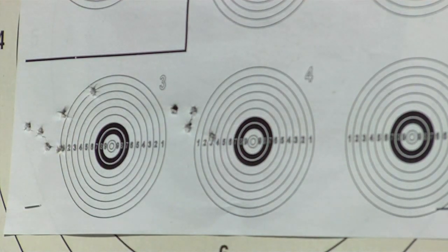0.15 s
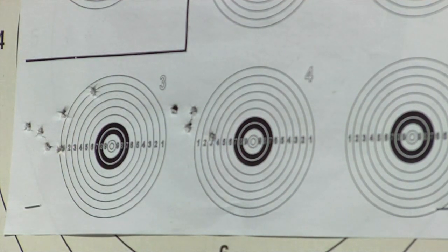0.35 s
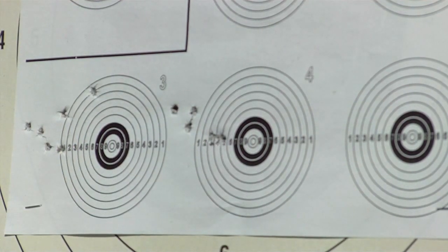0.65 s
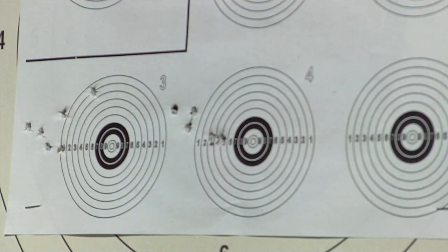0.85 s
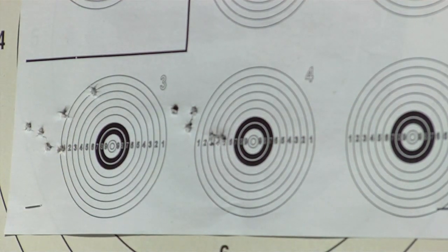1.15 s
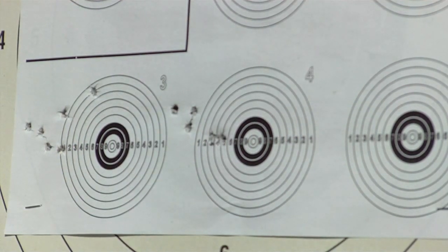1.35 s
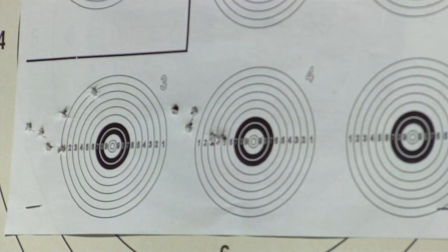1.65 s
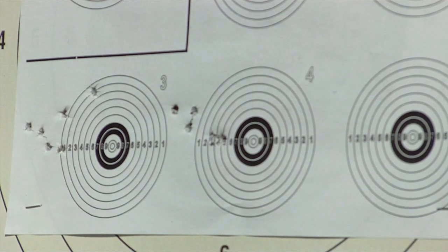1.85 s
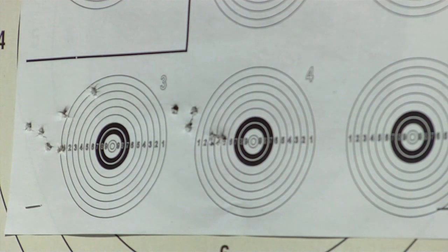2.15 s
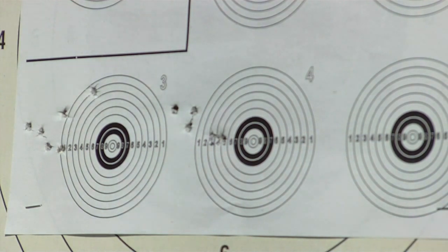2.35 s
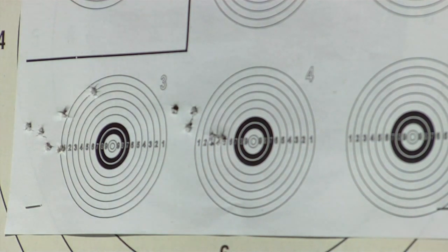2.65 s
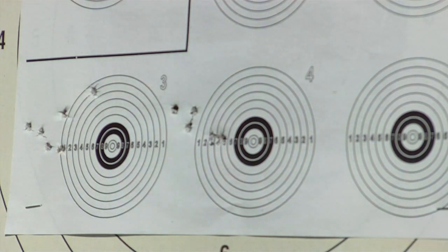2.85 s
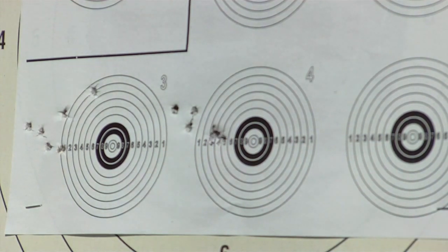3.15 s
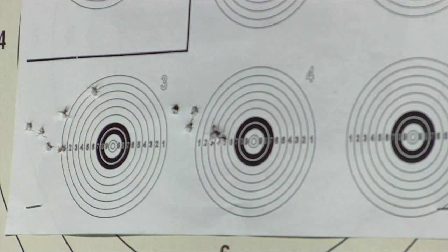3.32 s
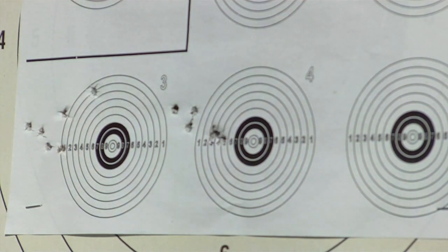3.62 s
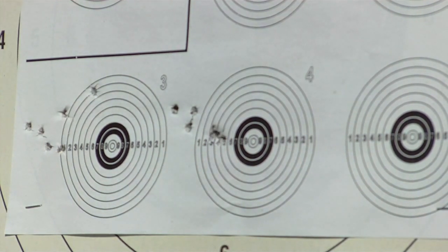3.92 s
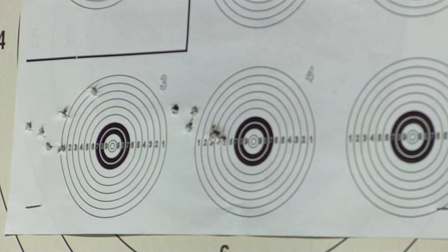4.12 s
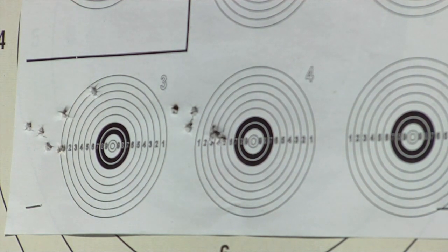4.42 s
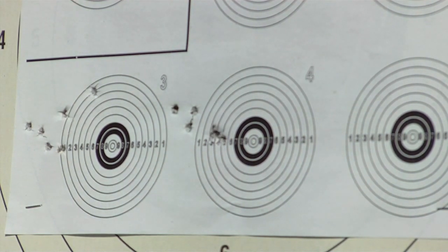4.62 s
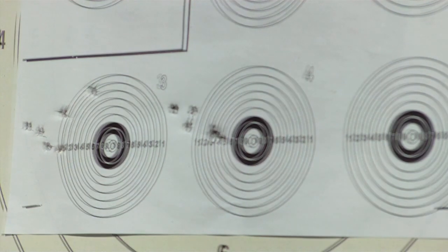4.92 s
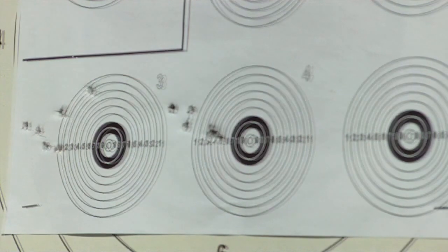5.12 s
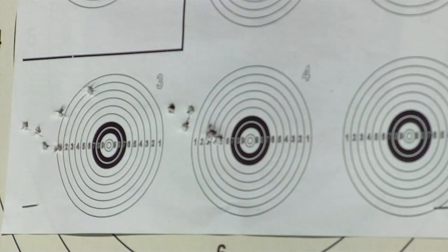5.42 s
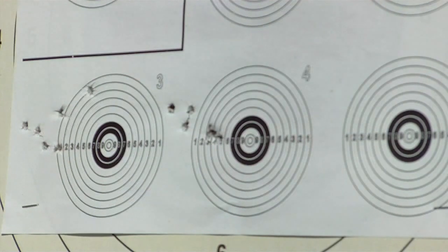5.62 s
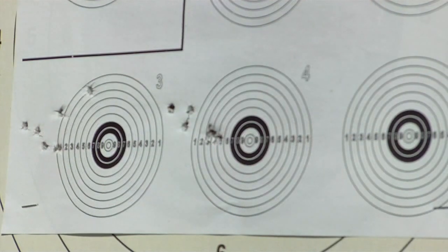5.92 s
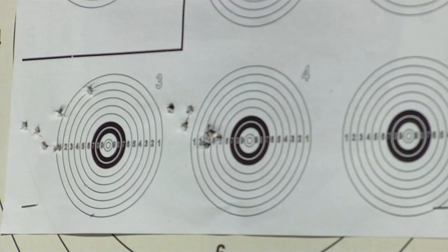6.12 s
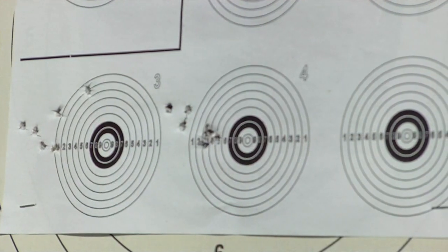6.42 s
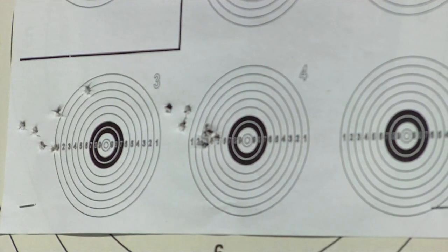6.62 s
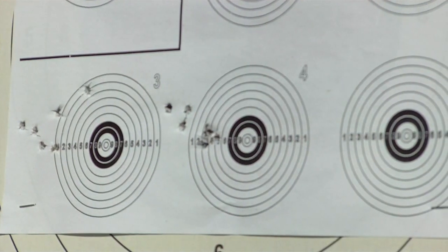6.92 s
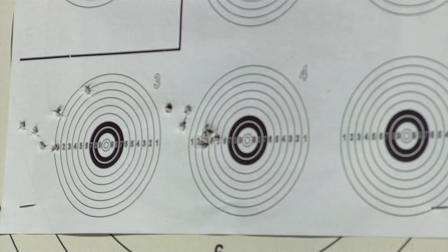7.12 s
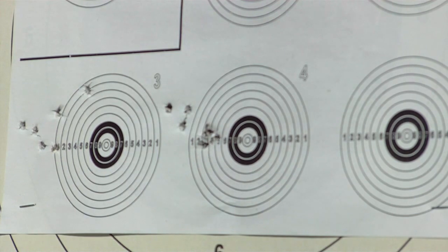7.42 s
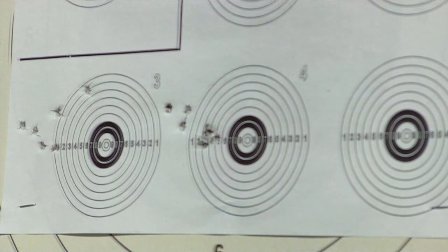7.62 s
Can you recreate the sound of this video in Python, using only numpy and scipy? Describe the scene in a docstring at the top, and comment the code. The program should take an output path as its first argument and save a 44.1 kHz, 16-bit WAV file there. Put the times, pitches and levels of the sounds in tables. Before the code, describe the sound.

Three air rifle shots crack and hit a target board outdoors, echoing through trees over wind rumble and faint birds.

```python
"""An air rifle fires three times across a wooded field, heard from beside the paper target.
At 0.4 s the muzzle pops and bounces between near walls; the slower pellet hisses in and smacks the
target 0.08 s later. Both overload the microphone, and the trees echo on. Then wind buffets the
microphone, far birds whistle, something clacks and the electronics tick, over a thin whine and a far
road. The rifle fires again at 3 s and 6 s, and a last gust thumps at 7.6 s."""
import sys
import numpy as np
from scipy import signal
from scipy.fft import rfft, irfft, next_fast_len
from scipy.io import wavfile
from scipy.ndimage import map_coordinates

SR = 44100
rng = np.random.default_rng(int(sys.argv[2]) if len(sys.argv) > 2 else 0)


def digitize_waveform(pressure):
    """Quantize a signal to 16-bit integers and store it at the path in sys.argv[1].

    Rows of a 2-D input are taken as channels; values are limited to [-1, 1].
    """
    field = np.atleast_2d(pressure).T
    bounded = np.clip(field, -1, 1)
    quanta = np.round(bounded * 32767).astype(np.int16)
    wavfile.write(sys.argv[1], SR, quanta)


N = 342657

# the shots: report_s, report_db, wall_round_trip_s, impact_s, impact_db, rebound_db, echo_db
SHOTS = [(0.3893, 8, .00855, .4721, 11, -7, -30), (2.988, 10, .00838, 3.0694, 12, -12.5, -30.5),
         (6.028, 10, .00832, 6.113, 12.5, -9, -30)]
# colour of a sharp crack, for the pellet's blow and the muzzle's turbulence: freq_hz, density_db
CRACK = [(100, -10.5), (1000, -3), (3700, -5), (5000, -6), (9000, -13.5), (16000, -19)]


def muzzle_reports():
    """The pop bounces between near walls, each pass doubled by the ground, then returns from the trees."""
    # the report head-on, with the blunt front of escaping air: freq_hz, density_db
    blast_colour = [(50, -15.5), (150, -4), (400, -9.5), (900, -6.5), (1500, -0.5), (2000, 2), (2500, 2),
                    (2780, 5), (3200, -3), (4200, -21), (7000, -30.5), (16000, -44)]
    # the report off soft ground, which returns the ring but swallows the blast: freq_hz, density_db
    ground_colour = [(40, -24), (160, -15.5), (400, -23.5), (900, -19), (1550, -10), (2150, -7), (2560, 0),
                     (2780, 3.5), (3050, -1), (3500, -7.5), (4300, -22.5), (7000, -36.5), (11000, -36),
                     (16000, -46.5)]
    # the report scattered by the trees: freq_hz, density_db
    echo_colour = [(100, -14), (400, -14.5), (900, -10), (1600, -6), (2050, -9.5), (2750, -0.5),
                   (3300, -1.5), (3900, -7), (4600, -14), (7000, -29.5), (11000, -28), (16000, -38)]
    # passes between the near walls: round_trips, gain_db
    passes = [(0, 1), (1, 2), (2, -16.5)]
    # fainter paths by ground and walls: offset_s, gain_db
    paths = [(-.003, -36.5), (-.0011, -25.5), (0.0119, -22), (0.0245, -25.5), (.0402, -26), (0.0487, -27)]
    out, t = np.zeros(N), clock(.05)
    blast, ground_pop = -pulse(blast_colour), -pulse(ground_colour)
    for report_s, report_db, round_trip_s, _, _, _, echo_db in SHOTS:
        for round_trips, gain_db in passes:
            arrival_s = report_s + round(round_trips) * round_trip_s
            pass_db = report_db + gain_db
            turbulence = fade(t, .012) * noise(CRACK, len(t))
            add(out, arrival_s, amp(pass_db) * blast)
            add(out, arrival_s, amp(pass_db - 22) * turbulence)
            add(out, arrival_s + .0047, amp(pass_db - 16.5) * ground_pop)
        for offset_s, gain_db in paths:
            add(out, report_s + offset_s, amp(report_db + gain_db) * ground_pop)
        echo = tree_echo(echo_colour, near_s=.045, falloff=.87, grain_db=1.47)
        add(out, report_s, amp(echo_db + 2) * echo)
    return out


def pellets():
    """The pellet hisses closer, punches through the paper into the board and rebounds twice."""
    # the pellet's hiss in flight: freq_hz, density_db
    flight_colour = [(1000, -15), (3500, -2), (7000, -11), (11000, 5.5), (16000, -10.5)]
    # the board's dull shudder: freq_hz, density_db
    shudder_colour = [(100, -10), (330, 5.5), (480, -2), (650, -4.5), (900, -4), (1700, -3.5), (3000, -3),
                      (4500, -14), (8000, -31.5), (16000, -40)]
    # tearing paper: freq_hz, density_db
    paper_colour = [(150, -1.5), (800, -6), (2000, -6.5), (3000, -1), (5000, -7), (7500, -17),
                    (10000, -8.5), (13500, -2), (16000, -9.5)]
    out, t = np.zeros(N), np.arange(2 ** 13) / SR
    for report_s, _, _, impact_s, impact_db, rebound_db, _ in SHOTS:
        left_s = clock(impact_s - report_s)[::-1]  # time left to fly, so distance to go
        approach = amp(-40) / (1 + left_s / .012)
        add(out, report_s, approach * noise(flight_colour, len(t))[:len(left_s)])
        add(out, impact_s, amp(impact_db) * board_hit(t, crack_db=-5.5, grit_db=-8.5))
        add(out, impact_s + .0073, amp(rebound_db) * board_hit(t, crack_db=-9.5, grit_db=-12.5))
        add(out, impact_s + .01, amp(rebound_db - 8.5) * board_hit(t, crack_db=-4.5, grit_db=-14))
        add(out, impact_s, amp(impact_db - 24) * fade(t, .038) * noise(shudder_colour, len(t)))
        tear = amp(-21.5) * fade(t, .051) + amp(-43) * fade(t, .21)
        add(out, impact_s, tear * noise(paper_colour, len(t)))
    return out


def board_hit(t, crack_db, grit_db):
    """One contact of the pellet: a gritty crack, and the board's modes ringing at new strengths."""
    # the target board's modes: pitch_hz, level_db, t60_s
    modes = [(290, -30.5, 0.0037), (1251.7, -27.5, 0.005), (1700, -18.5, 0.019), (2300, -24.5, 0.01),
             (2740, -18.5, 0.024), (3190, -11.5, 0.015), (3630, 4, 0.0041)]
    variations_db = rng.normal(0, 1, len(modes))
    ring = sum(amp(level_db + variation_db) * fade(t, t60_s) * np.sin(2 * np.pi * pitch_hz * t)
               for (pitch_hz, level_db, t60_s), variation_db in zip(modes, variations_db))
    grit = amp(grit_db) * fade(t, .0061) * noise(CRACK, len(t))
    return ring + grit + amp(crack_db) * pulse(CRACK, size=len(t))


def tree_echo(colour, near_s, falloff, grain_db):
    """An echo from countless trunks: it thins with distance, and the air takes the treble first."""
    # decay among the trees: freq_hz, t60_s
    decay_times = [(150, 1.9), (700, 5.3), (1600, 7.2), (3000, 4), (4500, 2.3), (7000, .9), (12000, 0.92)]
    # denser stands answer louder: delay_s, width_s, boost_db
    groves = [(.143, .011, 3.5), (.253, 0.008, 6), (0.428, 0.025, 2)]
    t = clock(2)
    hz, frame_s, bands = signal.stft(noise(colour, len(t)), SR, nperseg=256)
    decay = fade(frame_s, along(decay_times, hz)[:, None])
    tail = signal.istft(bands * decay, SR)[1][:len(t)]
    attack = 1 - np.exp(-t / .0022)
    thinning = (1 + t / near_s) ** -falloff
    groves_db = sum(db * np.exp(-((t - delay_s) / width_s) ** 2) for delay_s, width_s, db in groves)
    return tail * attack * thinning * amp(groves_db + grain_db * wobble(250, len(t)))


def wind():
    """Wind on the microphone: a lumpy rumble, and a flutter that grows faster, so gusts are brighter."""
    # the wind's strength: time_s, level_db
    strength = [(0, -53.5), (0.88, -46.5), (1.08, -32), (1.4, -43), (1.55, -26), (1.81, -30.5), (2.01, -23),
                (2.09, -32), (2.18, -21.5), (2.44, -29.5), (2.48, -39.5), (3.12, -39), (3.17, -30.5),
                (3.51, -38), (4.21, -41), (4.44, -31), (4.61, -40), (5.0, -42.5), (5.07, -35.5),
                (5.34, -36), (5.45, -51), (7.52, -52), (7.58, -31), (7.77, -39)]
    # deep rumble: freq_hz, density_db
    rumble_colour = [(5, -1.5), (12, 4.5), (22, 8.5), (45, -0.5), (70, -3.5), (100, -13.5), (150, -31),
                     (300, -100)]
    # the flutter above it: freq_hz, density_db
    flutter_colour = [(55, -31), (90, 1), (125, -2.5), (200, -11.5), (300, -21.5), (450, -38), (900, -59.5),
                      (2000, -100)]
    # the hardest eddies hit the microphone's port: centre_s, width_s, peak_db
    thumps = [(1.993, 0.0016, -13), (2.229, 0.0029, -13), (7.592, .008, -16)]
    full_gust_db, flutter_growth = -30, 1.7  # growth in dB per dB of wind
    t, wind_db = np.arange(N) / SR, automation(strength)
    eddies = wobble(rate_hz=33)
    rumble = unit(noise(rumble_colour) * amp(2.5 * eddies))
    flutter = unit(noise(flutter_colour) * amp(5 * eddies))
    flutter_db = -46 + flutter_growth * (wind_db - full_gust_db)
    out = amp(wind_db + .5) * rumble + amp(flutter_db) * flutter
    for centre_s, width_s, peak_db in thumps:
        out += amp(peak_db) * np.exp(-((t - centre_s) / width_s) ** 2)
    return out


def birds():
    """Far whistles swell as they slide to a held pitch; the farther ones come mostly via the trees."""
    # bird notes: start_s, length_s, start_hz, end_hz, level_db, wet_share (0-1)
    notes = [(1.221, 0.064, 2424, 4300, -52.5, 0.3), (1.57, .07, 2390, 4260, -52, 0.3),
             (1.828, 0.13, 3590, 3660, -62, .65), (2.276, .2, 3580, 3670, -66, .6),
             (2.286, .28, 1798, 1530, -65.5, .5), (2.687, 0.16, 2060, 2140, -67, .65),
             (2.725, .22, 3560, 3660, -65, .55), (2.805, .11, 3188, 2450, -54, .85),
             (4.225, 0.203, 3200, 3270, -62, 0.45), (4.999, 0.073, 3820, 3890, -62.5, .5),
             (6.576, .05, 3620, 3700, -54, .4), (7.002, 0.086, 3520, 3660, -55.5, 0.48)]
    out = np.zeros(N)
    for start_s, length_s, start_hz, end_hz, level_db, wet_share in notes:
        t, glide_s = clock(length_s), .65 * length_s
        pitch_hz = np.interp(t, [0, glide_s], [start_hz, end_hz]) * (1 + .008 * wobble(130, len(t)))
        swell_db = np.interp(t, [0, glide_s, length_s], [-11, 0, -3])
        envelope = amp(level_db + swell_db) * signal.windows.tukey(len(t), .5)
        note = envelope * np.sin(2 * np.pi * np.cumsum(pitch_hz) / SR)
        tail = rng.standard_normal(SR) * fade(clock(1), t60_s=.99)
        add(out, start_s, np.sqrt(1 - wet_share) * note)
        add(out, start_s, np.sqrt(wet_share) * signal.fftconvolve(note, tail / np.linalg.norm(tail)))
    return out


def clacks():
    """Faint, dry, distant clacks: each a click in a short rattle."""
    # the clacks: start_s, level_db
    hits = [(1.5095, -39.5), (6.6324, -35), (6.8328, -34.5)]
    # colour of click and rattle: freq_hz, density_db
    colour = [(200, -2), (800, 8), (1800, -6.5), (3000, 3), (4500, -10), (10000, -25), (16000, -28.5)]
    out, t, click = np.zeros(N), clock(.2), pulse(colour)
    for start_s, level_db in hits:
        add(out, start_s, amp(level_db - .5) * click)
        add(out, start_s - .002, amp(level_db - 9.5) * fade(t, .044) * noise(colour, len(t)))
    return out


def electronics():
    """A thin whine, spells of hiss in which the whine changes level, and ticks where the signal jumps."""
    # the whine's tones: pitch_hz, rms_db
    tones = [(7865, -83), (11989, -74.5)]
    # spells of hiss that the electronics switch on: start_s, end_s, whine_change_db
    spells = [(1.814, 2.431, 3), (4.771, 5.365, -4), (7.568, 7.8, -1)]
    # electronic hiss: freq_hz, density_db
    hiss_colour = [(100, 9), (500, 6.5), (1500, 4), (5000, 0.5), (16000, -2)]
    # electrical ticks: start_s, step_db
    ticks = [(1.7911, -34.5), (1.8172, -27), (2.4312, -32.5), (5.3649, -31), (7.5504, -31.5), (7.569, -31)]
    t = np.arange(N) / SR
    whine = sum(amp(rms_db) * np.sqrt(2) * np.sin(2 * np.pi * pitch_hz * t + .6 * wobble(90))
                for pitch_hz, rms_db in tones)
    hiss = amp(-67) * noise(hiss_colour)
    out = whine.copy()
    for start_s, end_s, whine_change_db in spells:
        out = np.where((t >= start_s) & (t < end_s), amp(whine_change_db) * whine + hiss, out)
    for start_s, step_db in ticks:
        add(out, start_s, -amp(step_db) * fade(clock(.1), .075))
    return out


def air_and_road():
    """A bed of still air and microphone hiss, with a far road that swells and fades."""
    # distant hum and microphone hiss: freq_hz, density_db
    air_colour = [(59, -47), (100, -25), (163, -5), (225, -9), (328, -20.5), (415, -17), (492, -22.5),
                  (547, -19), (854, -26), (930, -28), (2170, -30.5), (2370, -30), (10000, -35),
                  (12100, -35), (16000, -42.5)]
    # swells of far traffic: time_s, level_db
    traffic = [(0, -74.5), (1.2, -73.5), (2, -67), (2.7, -70.5), (3.6, -64.5), (4.6, -72.5), (5.2, -66),
               (5.8, -83), (7.77, -79)]
    # the road's murmur: freq_hz, density_db
    road_colour = [(120, -22.5), (240, -12.5), (330, 0), (410, -0.5), (520, 1), (650, -5.5), (900, -16),
                   (1500, -27.5), (4000, -59)]
    return amp(-62) * noise(air_colour) + amp(automation(traffic)) * noise(road_colour)


def amp(db):
    """Decibels as a gain."""
    return 10 ** (np.asarray(db) / 20)


def unit(x):
    """The signal scaled to rms 1."""
    return x / np.sqrt(np.mean(x ** 2) + 1e-20)


def clock(length_s):
    """Sample times in seconds."""
    return np.arange(int(length_s * SR)) / SR


def along(points, hz):
    """Read (freq_hz, value) points on a log frequency axis."""
    freqs_hz, values = np.transpose(points)
    return np.interp(np.log(hz + 1), np.log(freqs_hz + 1), values)


def automation(points):
    """Join (time_s, value) points into one value per sample."""
    return np.interp(np.arange(N) / SR, *np.transpose(points))


def wobble(rate_hz, size=N):
    """A smooth random curve with rate_hz knots a second."""
    knots = rng.standard_normal(int(size * rate_hz / SR) + 4)
    return map_coordinates(knots, [np.arange(size) * rate_hz / SR])


def noise(colour, size=N):
    """Noise of rms 1 with the given colour."""
    fft_size = next_fast_len(size)
    gain = amp(along(colour, np.fft.rfftfreq(fft_size, 1 / SR)))
    return unit(irfft(rfft(rng.standard_normal(fft_size)) * gain, fft_size)[:size])


def pulse(colour, size=2048):
    """The sharpest causal pulse with the given colour, peak 1."""
    gain = amp(along(colour, np.fft.rfftfreq(size, 1 / SR)))
    cepstrum = irfft(np.log(gain))
    wave = irfft(np.exp(rfft(2 * cepstrum[:size // 2], size)))
    return wave / np.abs(wave).max()


def fade(t, t60_s):
    """Decay by 60 dB in t60_s seconds."""
    return np.exp(-np.log(1000) * t / t60_s)


def add(track, start_s, sound):
    """Mix a sound into the track at start_s."""
    part = track[max(round(start_s * SR), 0):][:len(sound)]
    part += sound[:len(part)]


def scene():
    """A near-mono mix; only a trace of hiss differs between the channels."""
    mid = muzzle_reports() + pellets() + birds() + clacks() + wind() + electronics() + air_and_road()
    side = amp(-71.5) * noise([(100, 11.5), (1000, -3.5), (16000, 2.5)])
    return np.array([mid + side, mid - side])


def record(dry):
    """The input clips on each pop, the channels part in phase in the treble, and the top is cut off."""
    # each channel's phase shift, opposite in left and right: freq_hz, phase_rad
    phase_shift = [(100, .004), (500, .015), (2700, .005), (5000, 0.036), (8000, 0.11), (14000, 0.26)]
    # the microphone's response: freq_hz, gain_db
    response = [(100, 2), (14000, -0.5), (16000, -5)]
    ceiling, top_hz = .95, 16000
    clipped = dry / (1 + np.abs(dry / ceiling) ** 8) ** (1 / 8)
    fft_size = next_fast_len(N + SR // 2)
    hz = np.fft.rfftfreq(fft_size, 1 / SR)
    skew = np.exp(1j * np.outer([1, -1], along(phase_shift, hz)))
    low_pass = 1 / (1 + np.minimum(hz / top_hz, 2) ** 400)
    return irfft(rfft(clipped, fft_size) * skew * amp(along(response, hz)) * low_pass, fft_size)[:, :N]


dry = scene()
out = record(dry)
digitize_waveform(out)
```